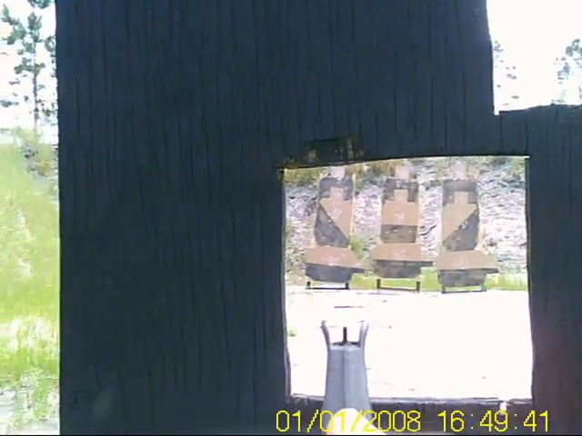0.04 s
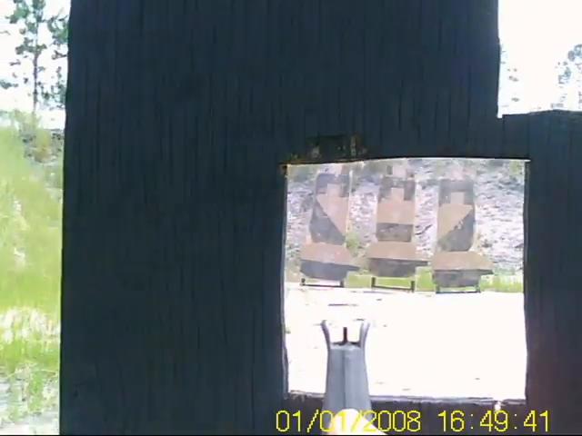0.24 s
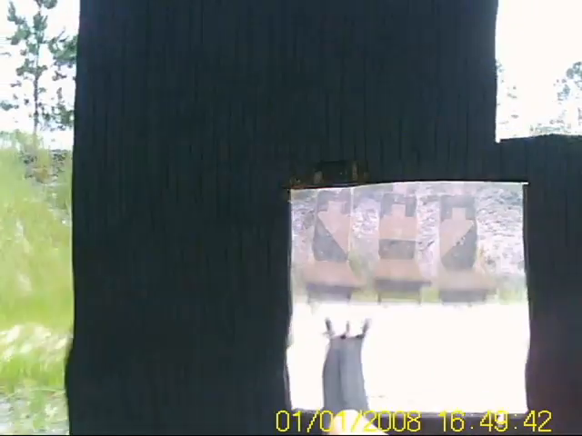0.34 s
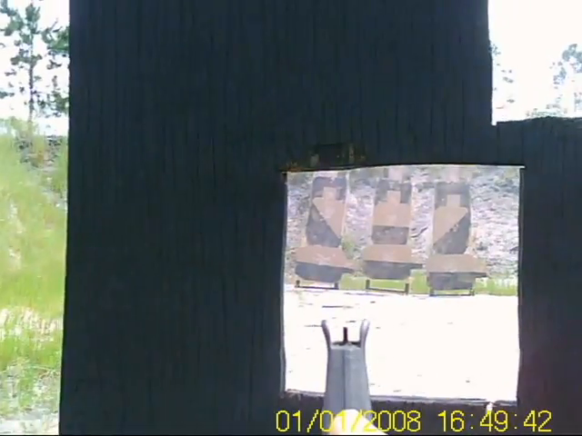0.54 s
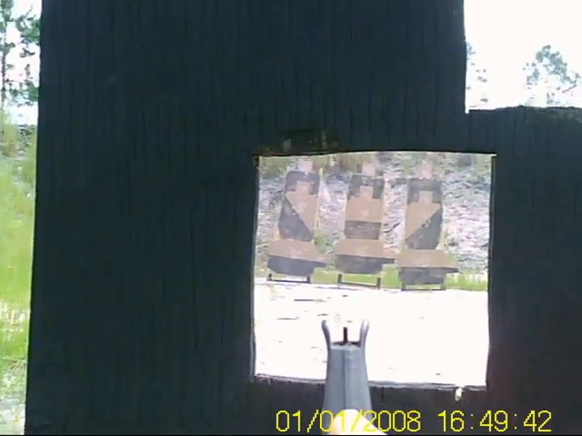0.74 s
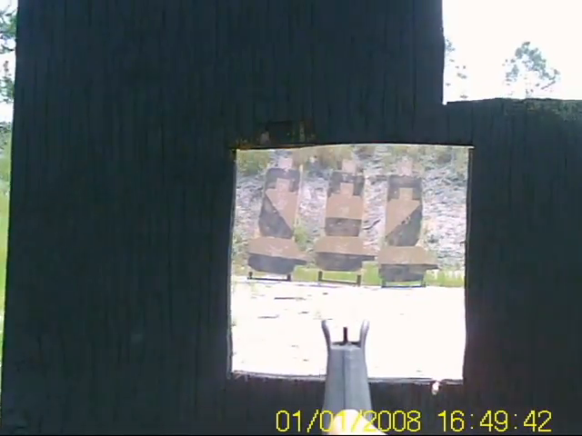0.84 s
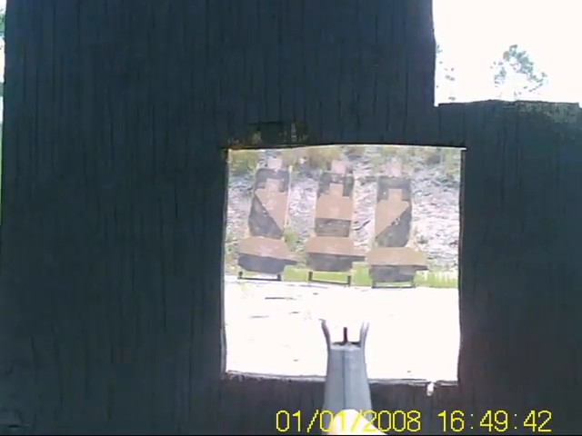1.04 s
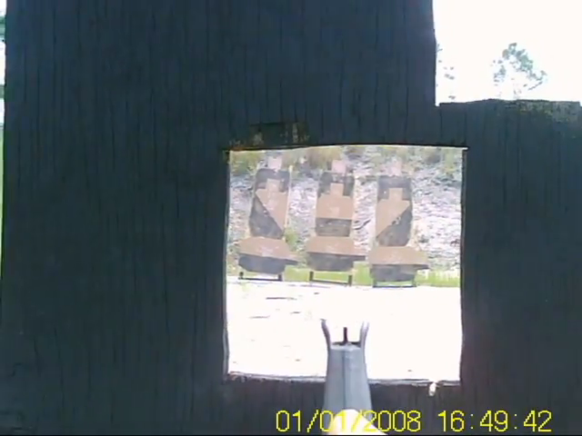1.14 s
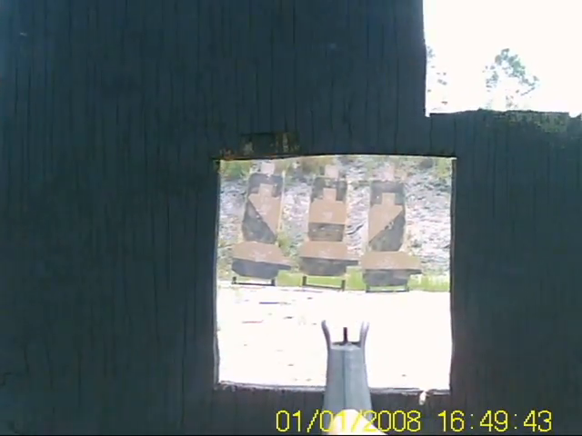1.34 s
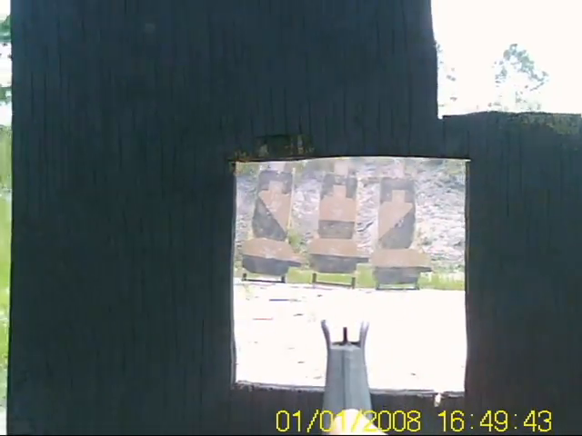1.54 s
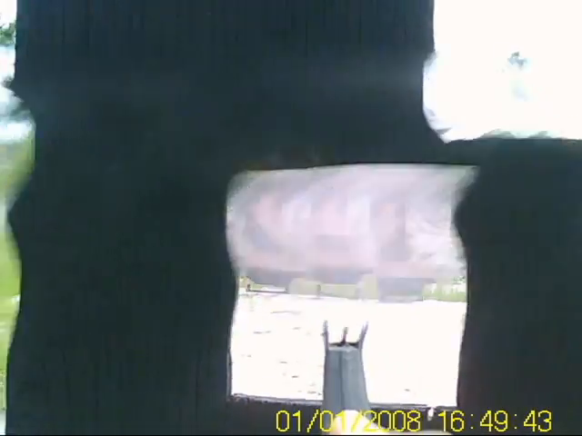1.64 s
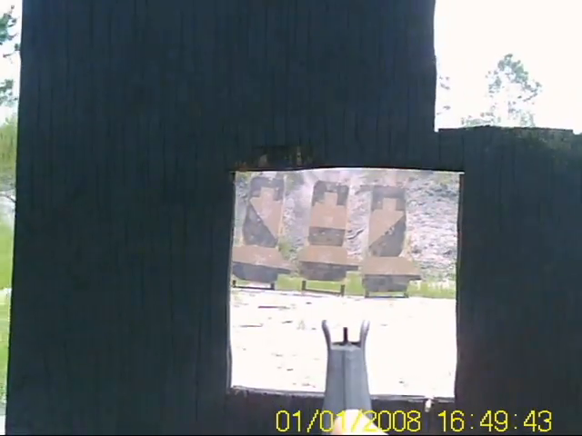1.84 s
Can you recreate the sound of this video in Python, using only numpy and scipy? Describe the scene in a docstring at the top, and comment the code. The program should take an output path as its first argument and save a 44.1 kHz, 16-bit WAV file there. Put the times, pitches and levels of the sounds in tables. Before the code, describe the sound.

A rifle fires two quick pairs of shots outdoors through a wooden barricade, heard from a microphone on the gun; sharp overloaded cracks, short ringing tails, metallic bolt clatter and spring buzz, then a quieter gap between pairs.

```python
"""Outdoor range, microphone on the gun: a carbine fires two quick pairs of shots through a wooden barricade.
A hammer click leads each shot: a crack, a ringing blast, reflections and a tail, all shaped noise bursts.
During the first blast gas pushes the microphone, which overloads lopsidedly, and the gain ducks, then creeps up.
After each shot but the last the action clatters and its spring buzzes; a dull echo follows each pair.
A trigger tick comes ahead of the second pair; one faint clack follows the last shot, over faint hiss and whine."""
import sys
import numpy as np
from scipy import signal
from scipy.fft import rfft, irfft
from scipy.io import wavfile

SR = 44100
rng = np.random.default_rng(int(sys.argv[2]) if len(sys.argv) > 2 else 0)


def transcribe(signal):
    """Save signal, clipped to [-1, 1], as a 16-bit WAV file at the path in sys.argv[1]."""
    frames = np.atleast_2d(signal).T
    limited = np.clip(frames, -1, 1)
    pcm = np.round(limited * 32767).astype(np.int16)
    wavfile.write(sys.argv[1], SR, pcm)


N = 83790

# The four shots; levels are relative to each layer's own setting, times after the shot unless named a lead:
# (time [s], blast level [dB], crack level [dB], crack decay [s], reflection level [dB], reflection delay [s],
#  range tail level [dB], hammer level [dB], hammer lead before the shot [s])
SHOT_TABLE = [(.0620, 1, 6.5, 0.0039, 2, 0.028, 4, 1, .0063),
              (.2792, -0.5, -6, 0.0039, 3.5, 0.025, 2.5, -1, 0.0067),
              (1.3877, 1, 0.5, 0.0012, 1, 0.028, 4, 0.5, .0068),
              (1.5995, 1, -1, 0.0028, 2.5, .0260, 2, 2.5, 0.0061)]


def undb(db):
    """Decibels to amplitude gain."""
    return 10 ** (np.asarray(db) / 20)


def noise(colour, tilt_db=0, peaks=()):
    """Noise of unit RMS with the given colour and resonances, tilted per octave above 500 Hz."""
    peak_width_hz = 32  # half-width of each resonance's bell
    colour_hz, colour_db = np.array(colour, float).T
    f = np.maximum(np.fft.rfftfreq(N, 1 / SR), 1)
    octaves_above = np.maximum(np.log2(f / 500), 0)
    boost_db = sum(db * np.exp(-((f - centre) / peak_width_hz) ** 2) for centre, db in peaks)
    shape_db = np.interp(np.log(f), np.log(colour_hz), colour_db) + tilt_db * octaves_above + boost_db
    y = irfft(rfft(rng.standard_normal(N)) * undb(shape_db), N)
    return y / y.std()


def burst(peak, rise, decay, hold=0):
    """Envelope of exponential rise, hold and exponential decay; all arguments in seconds."""
    t = np.arange(N) / SR - peak
    return np.exp(np.minimum(t, 0) / rise - np.maximum(t - hold, 0) / decay)


def after(start, ramp):
    """Gate that opens linearly from silence at the start time; arguments in seconds."""
    return np.clip((np.arange(N) / SR - start) / ramp, 0, 1)


def shots():
    """A bright crack, the blast ringing at the barricade, nearby reflections and the tail of the range."""
    # Colour of the crack: (frequency [Hz], level [dB])
    crack_colour = [(100, -14), (600, -6), (1200, -8), (2300, -0.5), (3300, -13.5), (4500, 0.5), (7000, -7),
                    (10000, -6.5), (15000, -28)]
    # Colour of the muzzle blast: (frequency [Hz], level [dB])
    blast_colour = [(40, -12.5), (150, -13.5), (400, -7.5), (630, -11.5), (800, -1.5), (1200, -7),
                    (1620, -4.5), (2100, -3), (3200, -17), (4400, -18.5), (7000, -21), (10000, -32.5),
                    (15000, -52)]
    # Colour of the nearby reflections: (frequency [Hz], level [dB])
    reflection_colour = [(40, -14), (150, -7.5), (400, -11.5), (630, -6), (800, -1.5), (1200, -6.5),
                         (1620, -4.5), (2100, -3), (3200, -14), (4400, -12), (7000, -17.5), (10000, -30),
                         (15000, -43)]
    # Colour of the range's tail, before its tilt: (frequency [Hz], level [dB])
    range_colour = [(40, -15), (120, -7), (250, -10.5), (390, -2), (600, -7.5), (1100, -8.5), (2000, -5.5),
                    (3300, -16.5), (5900, -16.5), (9500, -29), (11000, -36.5), (15000, -47)]
    # Resonances of the barricade and gun: (frequency [Hz], boost [dB])
    barricade_peaks = [(269, 5.5), (382, 7.5), (524, 10), (800, 6), (915, 10), (1105, 9.5), (1245, 6.5),
                       (1354, 6), (1470, 3), (1892, 5.5), (1992, 5), (2275, 3.5), (2825, 13)]
    crack_level_db, blast_level_db, reflection_level_db = -1, -0.5, -13.5
    near_level_db, far_level_db = -32, -48.5
    tail_peak_s, slow_rise_s = 0.025, 0.011  # the reflections and both tails share the rise

    out = np.zeros(N)
    for t, blast_db, crack_db, crack_decay, reflection_db, delay, tail_db, *_ in SHOT_TABLE:
        crack = undb(crack_level_db + crack_db) * noise(crack_colour)
        crack = crack * burst(t + 0.0016, 0.00023, crack_decay)

        blast = undb(blast_level_db + blast_db) * noise(blast_colour, peaks=barricade_peaks)
        blast = blast * burst(t + 0.0028, 0.0005, decay=0.0056)

        reflection = undb(reflection_level_db + reflection_db) * noise(reflection_colour, peaks=barricade_peaks)
        reflection = reflection * burst(t + delay, slow_rise_s, decay=0.006)

        near = undb(near_level_db) * noise(range_colour, tilt_db=-0.34)
        near = near * burst(t + tail_peak_s, slow_rise_s, decay=0.033)
        far = undb(far_level_db) * noise(range_colour, tilt_db=-5)
        far = far * burst(t + tail_peak_s, slow_rise_s, decay=0.085)
        tail = undb(tail_db) * (near + far)

        # Nothing of the shot is heard until just before its time
        out += (crack + blast + reflection + tail) * after(t - 0.0006, 0.001)
    return out


def pressure():
    """The slow push of gas from the first shot holds the microphone against its upper limit: a deep thump."""
    push = undb(-5) * burst(0.069, rise=0.004, decay=0.0006, hold=0.004)
    first_shot_s = SHOT_TABLE[0][0]
    return push * after(first_shot_s, 0.006)


def action():
    """Trigger tick, hammer before each shot, and clacks: the bolt knocks back, strips a round and slams shut."""
    # Clacks of the action: (time [s], level [dB], rise [s], decay [s], treble tilt before its limit [dB/octave])
    clacks = [(.1150, -22, 0.0011, 0.0085, -2.5), (0.127, -20.5, .002, .003, 5),
              (0.1319, -3.5, 0.00085, 0.00091, 1), (0.145, -29, 0.00062, .002, -6),
              (0.1445, -26, 0.0011, 0.0056, 4), (0.1697, -28, .0004, 0.0034, -15.5),
              (0.1726, -27, 0.00046, 0.0056, -10), (.3350, -28, 0.0021, .003, -1.5),
              (0.338, -17.5, 0.00047, 0.003, -1.5), (0.3485, -15.5, .002, 0.0045, -13),
              (0.3502, -3, .0007, 0.00091, 0), (0.361, -22.5, 0.0005, 0.0042, 5.5),
              (0.3652, -27, 0.00071, 0.011, -17), (.4085, -45.5, 0.00055, 0.0028, -6),
              (.4370, -49, 0.00043, .003, -8), (0.4833, -46, 0.00034, 0.0031, -4.5),
              (1.437, -22.5, 0.00076, 0.0036, -5.5), (1.447, -22, 0.00051, 0.0042, -6),
              (1.452, -21, .001, .004, 1.5), (1.4618, -15.5, 0.00057, 0.00094, -10),
              (1.465, -5, 0.0012, 0.0016, 1), (1.4757, -30.5, 0.00043, 0.0018, -1.5),
              (1.4789, -22.5, .0007, 0.0041, -2), (1.513, -47.5, 0.00087, 0.0034, -7),
              (1.5533, -49, .0005, 0.0011, -9.5), (1.5730, -49.5, .001, .004, -9),
              (1.7088, -36.5, .0003, 0.0013, -3)]
    # Colour of the steel parts, before the tilt: (frequency [Hz], level [dB])
    steel_colour = [(60, -29.5), (400, -30), (700, -15), (1100, -6.5), (1600, 0), (2000, -2.5), (2550, 6),
                    (3200, -24), (3700, -12.5), (4150, 3), (4700, -17.5), (6400, -10.5), (7600, -31),
                    (10000, -34.5), (15000, -72)]
    # Colour of the hammer: (frequency [Hz], level [dB])
    hammer_colour = [(100, -26), (1000, -13.5), (1500, -4.5), (2100, 13.5), (2600, 3), (3200, -17),
                     (4300, -12), (5200, -18.5), (6200, -20.5), (9500, -28.5), (15000, -47.5)]
    # Colour of the trigger tick: (frequency [Hz], level [dB])
    trigger_colour = [(100, -23), (600, -17.5), (880, -0.5), (1300, -7), (2100, -7), (3200, -27),
                      (12000, -40)]
    hammer_level_db, hammer_rise_s = -19.5, 0.0001
    max_tilt_db = 4  # per octave, either way

    out = undb(-58) * noise(trigger_colour) * burst(1.361, rise=0.001, decay=0.0034)
    for t, *_, hammer_db, lead in SHOT_TABLE:
        click = burst(t - lead, hammer_rise_s, decay=0.00035)
        ring = undb(-14.5) * burst(t - lead, hammer_rise_s, decay=0.012)
        out = out + undb(hammer_level_db + hammer_db) * noise(hammer_colour) * (click + ring)
    for t, db, rise, decay, tilt_db in clacks:
        tilt_db = np.clip(tilt_db, -max_tilt_db, max_tilt_db)
        out = out + undb(db) * noise(steel_colour, tilt_db) * burst(t, rise, decay)
    return out


def rattle():
    """Uneven gain of parts that chatter against each other: random decibels joined by straight lines."""
    points_per_s, spread_db = 670, 4.5
    steps = np.arange(N) / SR * points_per_s
    return undb(spread_db * np.interp(steps, np.arange(N), rng.standard_normal(N)))


def spring():
    """The bolt scrapes along its track; the recoil spring buzzes on, then settles."""
    # Bolt travel and spring buzz, before the rattle:
    # (time [s], sliding level [dB], spring level [dB], buzz length [s])
    cycles = [(0.098, -35.5, -48, 0.16), (0.317, -35, -46.5, 0.15), (1.437, -36.5, -48.5, 0.14)]
    # Colour of the sliding bolt: (frequency [Hz], level [dB])
    slide_colour = [(100, -16), (400, -10.5), (1000, -10.5), (1600, 0.5), (2400, 5.5), (3300, -9.5),
                    (4200, -4.5), (5000, -11), (6600, -9), (8000, -20.5), (12000, -29.5), (15000, -41)]
    # Colour of the spring, before its rings: (frequency [Hz], level [dB])
    spring_colour = [(100, -20), (400, -9), (1100, -16.5), (1750, -12.5), (2050, -1.5), (2250, 2),
                     (2600, -2), (3200, -21.5), (4000, -17), (4800, -15), (5500, -24), (6000, -16.5),
                     (6800, -24), (9500, -28), (10800, -42), (15000, -54)]
    # Rings of the recoil spring: (frequency [Hz], boost [dB])
    spring_peaks = [(2190, 3.5), (2290, 3), (2480, 3), (5950, 8.5)]
    slide_hold_s, slide_decay_s = 0.05, 0.0099
    sag_s, stop_s = 0.28, 0.034  # slow fading while it buzzes, quick fading once the buzz length is over

    slide, buzz = np.zeros(N), np.zeros(N)
    for t, slide_db, spring_db, length in cycles:
        slide += undb(slide_db) * burst(t, 0.011, slide_decay_s, slide_hold_s)
        buzz += undb(spring_db) * burst(t, 0.01, stop_s, length) * burst(t, 0.01, sag_s)
    return (slide * noise(slide_colour) + buzz * noise(spring_colour, peaks=spring_peaks)) * rattle()


def berms():
    """Dull, soft late echoes from the berms: low-coloured noise under slow bursts."""
    # Late echoes: (time [s], level [dB])
    echo_times = [(0.553, -64.5), (1.669, -41.5)]
    # Colour of the echoes: (frequency [Hz], level [dB])
    echo_colour = [(40, -15), (130, 3), (320, 11.5), (650, -10.5), (1400, -17), (3000, -28), (9000, -45)]
    envelope = sum(undb(db) * burst(t, rise=0.0054, decay=0.009) for t, db in echo_times)
    return noise(echo_colour) * envelope


def electronics():
    """Very faint self-noise of the recorder: coloured hiss and a few steady sine whines."""
    # Whine, before the recorder's filters: (frequency [Hz], level [dB])
    whine_tones = [(1200, -81), (3894, -81), (5600, -80), (7400, -81), (9600, -91.5)]
    # Colour of the hiss, before the recorder's filters: (frequency [Hz], level [dB])
    hiss_colour = [(30, 12), (100, 6), (300, -2.5), (2000, -3.5), (9000, -3.5), (12000, -11), (16000, -24)]
    t = np.arange(N) / SR
    hiss = undb(-72.5) * noise(hiss_colour)
    whine = sum(undb(db) * np.sin(2 * np.pi * hz * t) for hz, db in whine_tones)
    return hiss + whine


def scene():
    """The gun and its echoes, summed at the microphone as one channel."""
    return (shots() + pressure() + berms() + action() + spring())[None]


def gain_control(x):
    """Gain that ducks once, a moment after the first overload, then creeps back up."""
    start_gain_db, duck_db, recover_db_per_s = 12.3, 12.3, 2.5
    overload, duck_delay_s = 0.17, 0.0096  # the overload is a sample magnitude
    first_overload_s = np.argmax(np.abs(x[0]) > overload) / SR
    since = np.arange(N) / SR - first_overload_s - duck_delay_s
    reduction_db = (since > 0) * np.maximum(duck_db - recover_db_per_s * since, 0)
    return undb(start_gain_db - reduction_db)


def record(dry):
    """Lopsided microphone overload, gain control, output clipping, self-noise, band limits and a constant bias."""
    # The recorder's treble: (frequency [Hz], level [dB])
    treble = [(3000, -2.5), (8000, -3.5), (9800, -5), (11000, -9), (13500, -12), (15000, -28.5),
              (16500, -43.5)]
    clip_up, clip_down = 0.185, 0.79  # soft limits of the microphone, upward and downward
    leak = 0.02  # share of the sound that gets past the overload
    ceiling, bias = 0.82, -0.0034
    coupling_hz, top_hz = 6, 16000

    limit = np.where(dry > 0, clip_up, clip_down)
    x = limit * np.tanh(dry / limit) + leak * dry
    x = np.clip(x * gain_control(x), -ceiling, ceiling)
    x = x + electronics()

    x = signal.sosfilt(signal.butter(1, coupling_hz, "high", fs=SR, output="sos"), x)
    treble_hz, treble_db = np.array(treble).T
    response_db = np.interp(np.fft.rfftfreq(N, 1 / SR), treble_hz, treble_db)
    x = irfft(rfft(x) * undb(response_db), N)
    low_pass = signal.ellip(8, 0.2, 70, top_hz, fs=SR, output="sos")  # 0.2 dB ripple, 70 dB stop band
    return signal.sosfilt(low_pass, x) + bias


dry = scene()
out = record(dry)
transcribe(out)
```